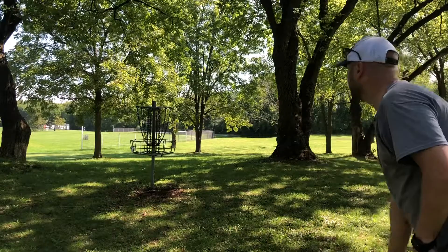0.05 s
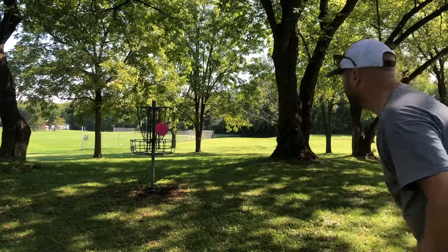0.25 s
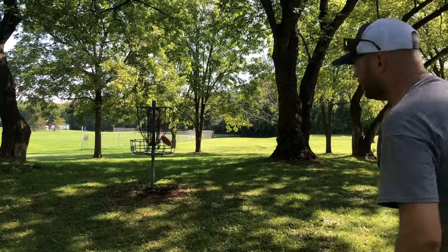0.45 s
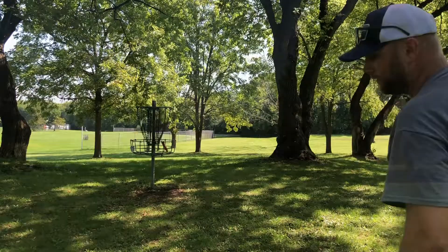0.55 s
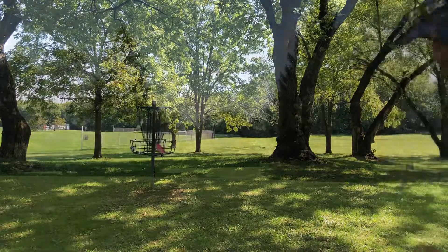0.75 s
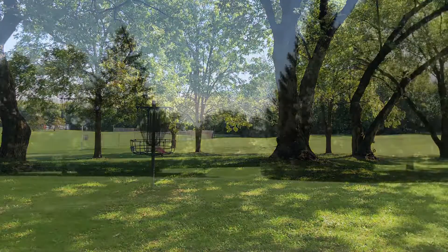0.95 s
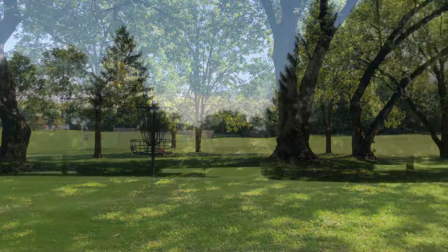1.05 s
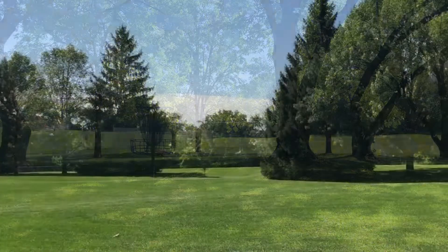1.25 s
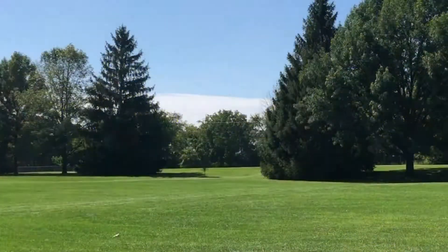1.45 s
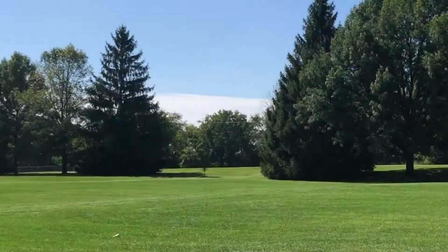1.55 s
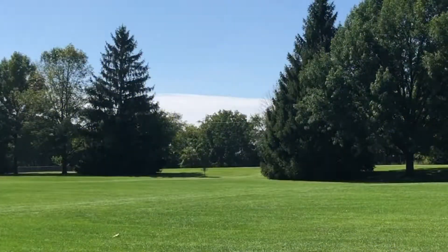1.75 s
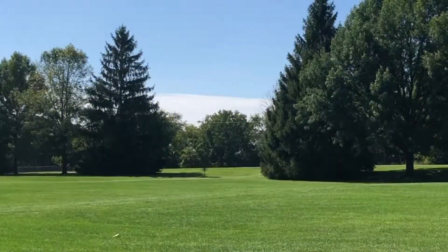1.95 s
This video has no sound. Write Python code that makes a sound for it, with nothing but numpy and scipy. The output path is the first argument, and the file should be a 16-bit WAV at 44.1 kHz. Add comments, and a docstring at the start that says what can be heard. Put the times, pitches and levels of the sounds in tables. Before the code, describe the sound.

A disc crashes into a metal basket's chains, which jingle brightly and settle outdoors.

```python
"""A far engine hums over low outdoor rumble as a plastic disc slams into the hanging steel chains of a
basket in a park. The disc clacks and flexes; the links clash, scrape and jingle as they swing out, and the
rings that gather the chains ring clearly. The disc drops into the wire tray and excites its modes.
The hum fades and the chains settle with a few pings and ticks. Last come a click and two dull taps nearby."""
import sys
import numpy as np
from scipy import signal
from scipy.fft import rfft, irfft, next_fast_len
from scipy.io import wavfile
from scipy.ndimage import uniform_filter1d, map_coordinates

SR = 44100
rng = np.random.default_rng(int(sys.argv[2]) if len(sys.argv) > 2 else 0)


def unload_wav(signal):
    """Save mono or channel-first audio to the path in sys.argv[1] as 16-bit WAV at rate SR, clipped to [-1, 1]."""
    wavfile.write(
        sys.argv[1],
        SR,
        np.round(np.clip(np.atleast_2d(signal).T, -1, 1) * 32767).astype(np.int16),
    )


N = 88200

# agitation of the swinging chains: time_s, level_db
CHAIN_MOTION = [(.24, -32), (.34, -26.5), (.39, -30.5), (.45, -32.5), (.56, -39.5), (.62, -45), (.69, -42),
                (.8, -45.5), (.93, -49), (1.03, -55.5), (1.14, -61), (1.25, -75), (1.5, -82)]


def disc():
    """Impact: brief contacts make broadband clacks, and the blows excite the disc's bending modes."""
    # knocks on chains and tray: start_s, level_db, centre_hz, t60_s
    knocks = [(0.2418, -19.5, 2440, 0.018), (0.2689, -20, 2150, 0.028), (0.2956, -23, 2000, 0.011),
              (0.3085, -24, 1140, 0.017), (.32, -32.5, 1305, 0.028), (0.345, -32, 1100, 0.02),
              (0.41, -38, 1000, 0.024), (.551, -45.5, 2100, .05), (.605, -34.5, 1900, 0.03),
              (0.675, -45.5, 1900, 0.045), (0.786, -45.5, 960, 0.062), (.886, -53.5, 950, 0.071)]
    # bending modes: pitch_hz, level_db, t60_s
    modes = [(620, -9.5, 0.035), (802, 1, 0.035), (1014, -1, 0.036)]
    # blows that bend the disc: start_s, level_db
    flexes = [(.242, -30.5), (.274, -35), (.298, -31), (.311, -29), (0.344, -31.5), (.412, -38),
              (0.435, -55)]
    # softer, longer knocks rise more slowly
    clacks = sum(2 * amp(db) * band(hz, octaves=0.81) * fade(s, t60, attack_s=0.13 * t60)
                 for s, db, hz, t60 in knocks)
    return clacks + struck(modes, flexes)


def chains():
    """Contact damping: the disc mutes the lower modes of the links until they swing free."""
    # response of the pressed links: frequency_hz, gain_db
    muting = [(4900, -8.5), (6800, -9.5), (8500, -5.5), (11100, -4), (12400, 2.5), (14100, -1.5),
              (15500, -2)]
    free = shimmer(links())
    curve_hz, curve_db = np.transpose(muting)
    pressed = filtered(free, lambda hz: amp(np.interp(hz, curve_hz, curve_db)))
    release = np.interp(clock(), (0.5, 0.61), [0, 1])
    return pressed + release * (free - pressed)


def links(count=40, per_clash=9, strays_per_s=160):
    """Modal superposition: each contact, bunched or stray, rings one of many slightly different links."""
    # bunches of links colliding: start_s, level_db, length_s
    clashes = [(0.238, -30, 0.0057), (0.257, -24.5, 0.0061), (0.271, -28, .012), (0.299, -26, 0.0035),
               (0.318, -32, 0.0097), (0.331, -22, .016), (.361, -30, 0.0076), (0.483, -33.5, .02),
               (0.545, -33, .012), (0.601, -44.5, 0.0038), (0.656, -33.5, .01), (0.673, -33.5, 0.0067),
               (0.715, -45, 0.012), (0.762, -40, 0.0091), (1.088, -55, .02), (1.138, -57.5, 0.0076),
               (1.296, -66.5, .004)]
    # modes of a link: pitch_hz, level_db, t60_s, spread_hz
    modes = [(4950, -15.5, 0.47, 45), (5950, -21, .3, 200), (6765, -11.5, 0.35, 50), (8290, -10, 0.36, 50),
             (8830, -6.5, 0.28, 150), (10310, -10, 0.14, 140), (11130, -11.5, 0.33, 55),
             (11640, -16, 0.3, 60), (12590, 5, .23, 110), (12680, -4, 0.19, 240), (13609, -8.5, .25, 60),
             (14110, -4.5, 0.22, 130), (15330, -12, 0.2, 130)]
    clash_s = np.concatenate([s + length * rng.random(per_clash) for s, db, length in clashes])
    clash_db = np.repeat([db for s, db, length in clashes], per_clash)
    stray_s = np.arange(CHAIN_MOTION[0][0], CHAIN_MOTION[-1][0], 1 / strays_per_s)
    variation = rng.standard_normal((count, len(modes), 2))
    force, lateness = rng.standard_normal((len(clash_s) + len(stray_s), 2)).T
    stray_s += np.abs(lateness[len(clash_s):]) / strays_per_s
    stray_db = np.interp(stray_s, *np.transpose(CHAIN_MOTION))
    sizes = amp(np.r_[clash_db, stray_db] + 4 * force) / np.sqrt(per_clash)
    onsets = (np.r_[clash_s, stray_s] * SR).astype(int)
    t, out = clock()[:SR // 2], np.zeros(N)
    for k in range(count):
        ringing = sum(amp(db + 3.9 * strength) * decay(t, t60)
                      * np.sin(2 * np.pi * (hz + spread * detune) * t)
                      for (hz, db, t60, spread), (detune, strength) in zip(modes, variation[k]))
        hits = np.bincount(onsets[k::count], sizes[k::count], N)[:N]
        out += signal.fftconvolve(hits, ringing / np.std(ringing[:SR // 100]))[:N]
    return out


def shimmer(x, depth_db=3.5):
    """Amplitude modulation: turning links make each group of modes swell and sink at random."""
    spectrum = signal.stft(x, nperseg=256)[2]
    field = rng.standard_normal(spectrum.shape)
    for axis, size in ((0, 5), (1, 14), (1, 14)):  # smooth over frequency, then twice over time
        field = uniform_filter1d(field, size, axis)
    gain = amp(depth_db * np.clip(unit(field), -2, 2))
    return signal.istft(spectrum * unit(gain), nperseg=256)[1][:N]


def scrape(clicks_per_s=1800):
    """Friction: steel sliding on steel and on the disc makes dense, toneless clicks."""
    # strength of the sliding: time_s, level_db
    sliding = [(.2385, -75.5), (.2415, -27.5), (.255, -31), (.32, -28), (.36, -34.5), (.39, -36.5),
               (.45, -45.5), (.53, -48), (.64, -47.5), (.68, -39.5), (.73, -49), (.9, -57), (1.2, -67),
               (1.5, -96)]
    # its spectrum: frequency_hz, gain_db
    colour = [(250, -30), (700, -5.5), (1300, -9.5), (2300, -4), (3400, -8.5), (4600, 0.5), (7000, -3.5),
              (8700, -1.5), (10500, -3.5), (13000, 0), (15800, -11.5)]
    clicks = (rng.random(N) < clicks_per_s / SR) * rng.standard_normal(N)
    energy = signal.fftconvolve(clicks ** 2, fade(0, t60=0.013) ** 2)[:N]
    grit = np.sqrt(np.abs(energy)) * rng.standard_normal(N)
    return level(sliding) * coloured(grit, colour)


def rings(waver_rad=0.54, waver_per_s=70, grip_s=0.0033):
    """Beats: the gathering rings sound two close modes and a high one until a new contact damps them."""
    # ring modes: pitch_hz
    modes = [4233, 4283, 11872]
    # strikes: start_s, t60_s, first_mode_db, second_mode_db, third_mode_db
    strikes = [(.26, 0.21, -25, -36, -41.5), (0.301, 0.42, -25.5, -27, -27), (.331, 0.31, -36, -30, -19),
               (.343, 0.2, -21.5, -36, -30), (0.36, 0.35, -29.5, -31, -19.5),
               (0.4706, 0.096, -22, -31, -36), (0.488, 0.38, -27.5, -38, -37), (.551, 0.37, -42, -57, -48),
               (.677, 0.09, -37, -40, -24), (0.701, 0.67, -38, -44, -43.5), (0.98, 0.2, -54, -61, -68),
               (1.037, 0.41, -61, -65, -72), (1.191, 0.15, -55, -57, -68)]
    # jostled by the chains, a ring wavers in phase and strength, less as they calm
    motion = level(CHAIN_MOTION)
    waver = waver_rad * (motion / motion.max()) ** 0.25
    tones = [np.sin(2 * np.pi * hz * clock() + waver * wobble(waver_per_s))
             * np.exp(0.5 * waver * wobble(waver_per_s)) for hz in modes]
    ends = [row[0] for row in strikes[1:]] + [N / SR]
    out = np.zeros(N)
    for (s, t60, *mode_db), end in zip(strikes, ends):
        damping = np.exp(-np.maximum(clock() - end, 0) / grip_s)
        out += damping * fade(s, t60) * sum(amp(db) * tone for tone, db in zip(tones, mode_db))
    return out


def pings(spread_hz=120.2):
    """Free vibration: three detuned links beat together, in a short tinkle of the neighbours they brush."""
    # links swinging free: start_s, level_db, pitch_hz, t60_s
    swings = [(.474, -33, 14150, 0.15), (.545, -35, 8930, 0.17), (.562, -47, 8300, 0.22),
              (.555, -34, 11100, 0.12), (.625, -42, 10500, .09), (.653, -44.5, 6700, 0.18),
              (.657, -36, 10240, 0.11), (0.766, -34, 12500, 0.08), (.765, -40.5, 8730, 0.31),
              (.85, -50, 6765, 0.29), (0.907, -42.5, 9100, 0.12), (.95, -50, 8300, 0.096),
              (1.0, -53, 8650, 0.18), (1.034, -40.5, 13950, 0.13), (1.033, -51, 12550, 0.61),
              (1.139, -58, 14300, 0.11), (1.2, -54, 12600, 0.17)]
    detunes = spread_hz * rng.standard_normal((len(swings), 2))
    out = np.zeros(N)
    for (s, db, hz, t60), offsets in zip(swings, detunes):
        trio = sine(hz) + 0.5 * sum(sine(hz + offset) for offset in offsets)
        tinkle = amp(-5.5) * band(hz, octaves=0.077) * fade(s, t60=0.07)
        out += amp(db) * (trio * fade(s, t60, attack_s=0.0024) + tinkle)
    return out


def ticks():
    """Hard contact: very short collisions of steel spread their energy over a wide, bright band."""
    # collisions: start_s, level_db, t60_s, centre_hz
    contacts = [(0.4700, -29, 0.017, 4506), (.676, -27, 0.028, 4960), (1.089, -51, 0.059, 6000),
                (1.27, -58, .03, 6960), (1.2995, -46.5, 0.016, 4750)]
    return sum(amp(db) * band(hz, octaves=1.47) * fade(s, t60) for s, db, t60, hz in contacts)


def tray():
    """Resonance: the wire tray rings at its natural frequencies under the heavier blows."""
    # tray modes: pitch_hz, level_db, t60_s
    modes = [(955, -2.5, 0.55), (1830, -0.5, 0.75), (1927, -4.5, 0.4), (2040, -8, .6), (2236, -1, 0.34),
             (2600, -9.5, .3)]
    # blows on the tray: start_s, level_db
    blows = [(.272, -53), (.553, -60), (0.606, -49), (0.789, -57.5)]
    return struck(modes, blows)


def click(start_s=1.6655, echo_delay_s=0.0095):
    """Reflection: a dry snap close by returns off the ground and trails away in a rustle."""
    # modes of the snap: level_db, pitch_hz, t60_s
    modes = [(-34, 1290, 0.01), (-30, 1910, 0.006), (-30.5, 4400, 0.0031), (-40, 12500, 0.0011)]
    # rustling tail: level_db, centre_hz, width_octaves, t60_s
    tail_bands = [(-51.5, 2650, .9, 0.098), (-60, 13500, .3, .13)]
    snap = sum(amp(db) * pluck(start_s, hz, t60) for db, hz, t60 in modes)
    echo = sum(amp(db) * pluck(start_s + echo_delay_s, hz, t60) for db, hz, t60 in modes)
    rustle = sum(amp(db) * band(hz, width) * fade(start_s, t60) for db, hz, width, t60 in tail_bands)
    return snap + amp(-17) * echo + rustle


def taps(t60=0.0076):
    """Heavy damping: two dull taps on a soft body die within a few cycles, amid a scuff of rubbing."""
    # taps: start_s, level_db, pitch_hz
    blows = [(1.8068, -27, 660), (1.8351, -21, 833)]
    # rubbing around them: time_s, level_db
    scuff = [(1.775, -90), (1.79, -52.5), (1.82, -61.5), (1.845, -55), (1.87, -61), (1.9, -85.5)]
    out = np.zeros(N)
    for s, db, hz in blows:
        tone = 2 * pluck(s, hz, t60, attack_s=0.0015)
        thud = amp(-13) * pluck(s, hz=407, t60=2 * t60)
        noise = 0.29 * band(hz, octaves=0.75) * fade(s, t60)
        out += amp(db) * (tone + thud + noise)
    return out + level(scuff) * band(850, octaves=1.0)


def engine(waver=0.012):
    """Frequency modulation: the partials of a far engine drift in pitch together as its hum fades."""
    # partials: pitch_hz, level_db
    partials = [(85.5, -43), (254, -51.5), (339, -60), (425, -59.5)]
    # fading of the hum: time_s, gain_db
    fading = [(0, 1.5), (.35, -3), (.65, -2.5), (.9, -11), (1.2, -40)]
    drifting_time = clock() + np.cumsum(waver * wobble(8)) / SR
    hum = sum(amp(db) * np.sin(2 * np.pi * (hz * drifting_time + rng.random())) for hz, db in partials)
    return np.sqrt(2) * hum * level(fading)


def air():
    """Incoherent noises add in power: one outdoor rumble blends into another under a faint, rising hiss."""
    # spectra of the air under the trees and on the open lawn: frequency_hz, gain_db
    shade_colour = [(20, -39), (45, -12), (75, -1.5), (110, -3.5), (160, -7.5), (220, -14.5), (420, -17.5),
                    (600, -25.5), (1000, -24.5), (2660, -43.5), (8000, -53), (15800, -60.5)]
    lawn_colour = [(15, -43.5), (25, -4.5), (94, 1), (291, -13.5), (449, -26.5), (513, -23.5),
                   (1180, -27.5), (1680, -29.5), (1870, -30), (2150, -33), (3050, -32), (11700, -47),
                   (12700, -51), (15800, -55)]
    # swell of the rumble: time_s, gain_db
    swell = [(0, -0.5), (.7, -0.5), (1.12, -1.5), (1.4, -0.5), (2, 1.5)]
    # rise of the hiss: time_s, level_db
    hiss_rise = [(0, -82), (1.2, -72.5), (1.6, -71), (2, -62.5)]
    lawn_share = np.interp(clock(), (0.7, 1.29), [0, 1])
    shade = amp(-47.5) * np.sqrt(1 - lawn_share) * coloured(rng.standard_normal(N), shade_colour)
    lawn = amp(-48) * np.sqrt(lawn_share) * coloured(rng.standard_normal(N), lawn_colour)
    return (shade + lawn) * level(swell) + level(hiss_rise) * band(3160, octaves=0.8)


def amp(db):
    """Amplitude ratio of a level in decibels."""
    return 10 ** (np.asarray(db) / 20)


def unit(x):
    """x scaled to rms 1."""
    return x / np.sqrt(np.mean(x ** 2) + 1e-20)


def clock():
    """Time of each sample in seconds."""
    return np.arange(N) / SR


def level(rows):
    """Gain per sample from (time_s, level_db) points."""
    return amp(np.interp(clock(), *np.transpose(rows)))


def decay(t, t60):
    """Exponential decay, 60 dB in t60 seconds."""
    return np.exp(-np.log(1000) * t / t60)


def fade(start_s, t60, attack_s=0.0002):
    """Envelope of a blow: quick rise, exponential decay."""
    age = np.maximum(clock() - start_s, 0)
    return decay(age, t60) * (1 - np.exp(-age / attack_s))


def filtered(x, response):
    """Linear filtering: the spectrum of x times a response of frequency."""
    size = next_fast_len(N + SR // 2)
    return irfft(rfft(x, size) * response(np.fft.rfftfreq(size, 1 / SR)), size)[:N]


def coloured(x, points):
    """x through a (frequency_hz, gain_db) curve, at rms 1."""
    curve_hz, curve_db = np.transpose(points)
    return unit(filtered(x, lambda hz: amp(np.interp(np.log(hz + 1), np.log(curve_hz), curve_db))))


def band(centre_hz, octaves):
    """Noise of rms 1 in one resonance."""
    noise = rng.standard_normal(N)
    return unit(filtered(noise, lambda hz: 1 / (1 + (np.log2((hz + 1) / centre_hz) / octaves) ** 2) ** 1.37))


def sine(hz):
    """A pure tone of random phase."""
    return np.sin(2 * np.pi * (hz * clock() + rng.random()))


def wobble(knots_per_s):
    """A smooth random curve."""
    return map_coordinates(rng.standard_normal(N // 100), [clock() * knots_per_s], mode="wrap")


def struck(modes, blows):
    """Superposition: every blow rings the same set of damped modes."""
    return sum(amp(db + mode_db) * sine(hz) * fade(s, t60, attack_s=0.00083)
               for s, db in blows for hz, mode_db, t60 in modes)


def pluck(start_s, hz, t60, attack_s=0.00022):
    """A damped oscillator that starts from rest."""
    return np.sin(2 * np.pi * hz * (clock() - start_s)) * fade(start_s, t60, attack_s)


def scene():
    """Scattering: the trees add a faint reverberation to the basket, over the sounds of the park."""
    park = engine() + air() + click() + taps()
    scatter = rng.standard_normal(N) * fade(0, t60=0.46)
    scatter /= np.linalg.norm(scatter)
    basket = disc() + tray() + scrape() + rings() + ticks() + pings() + chains()
    return (park + basket + amp(-12) * signal.fftconvolve(basket, scatter)[:N])[None]


def record(dry, low_cut_hz=31, top_hz=15850):
    """Band limiting: the deep bass rolls off and nothing passes above top_hz."""
    return filtered(dry[0], lambda hz: (hz < top_hz) * hz ** 4 / (hz ** 4 + low_cut_hz ** 4))[None]


dry = scene()
out = record(dry)
unload_wav(out)
```